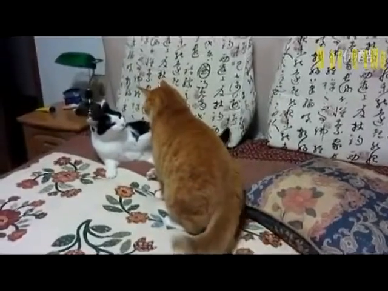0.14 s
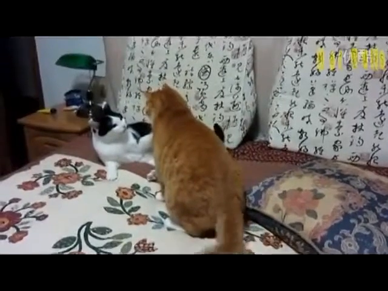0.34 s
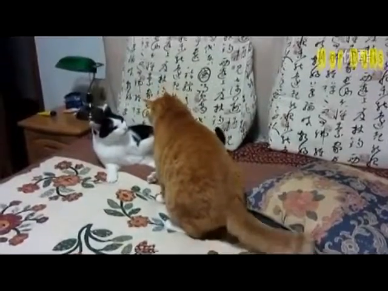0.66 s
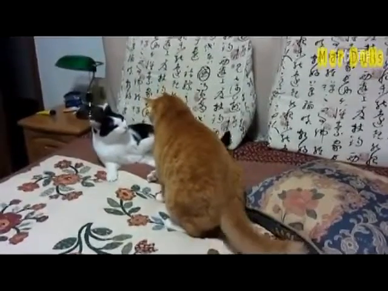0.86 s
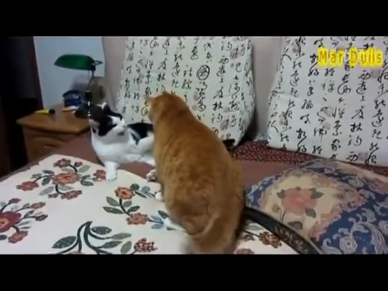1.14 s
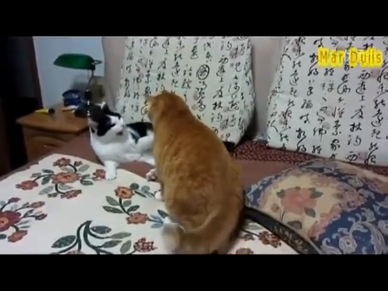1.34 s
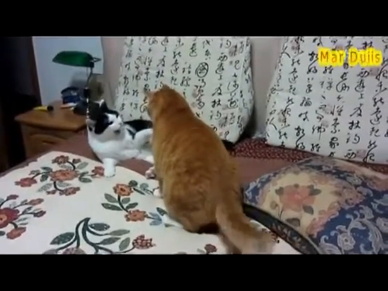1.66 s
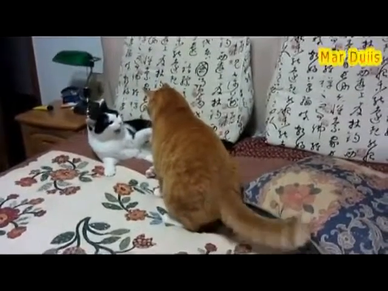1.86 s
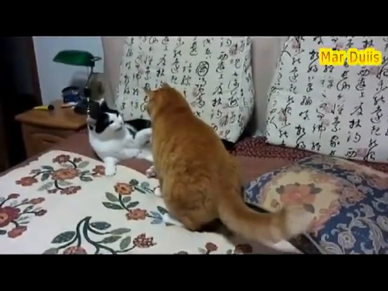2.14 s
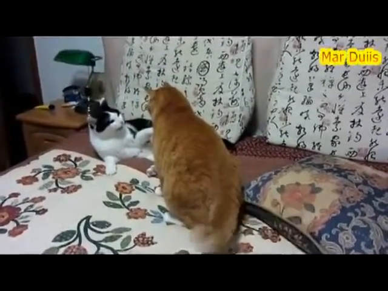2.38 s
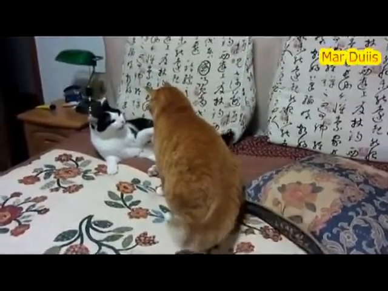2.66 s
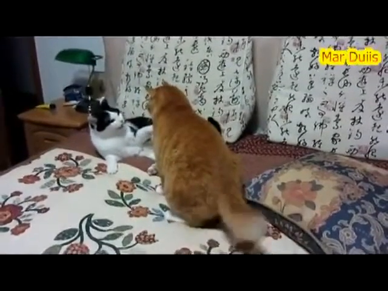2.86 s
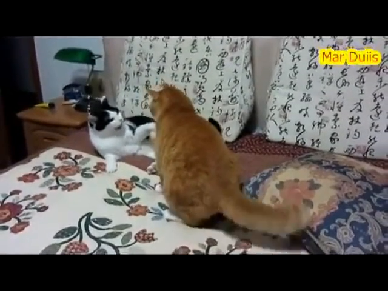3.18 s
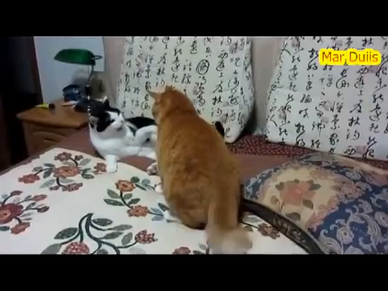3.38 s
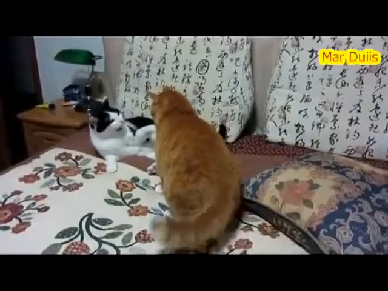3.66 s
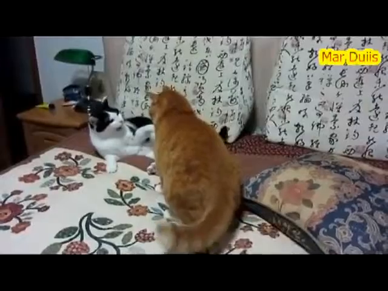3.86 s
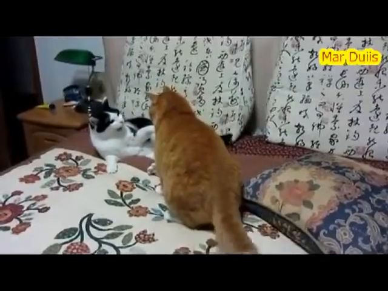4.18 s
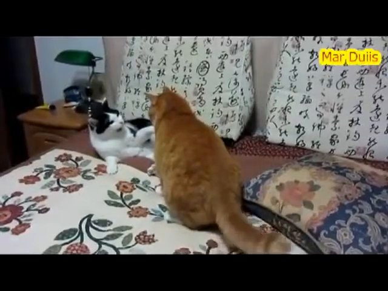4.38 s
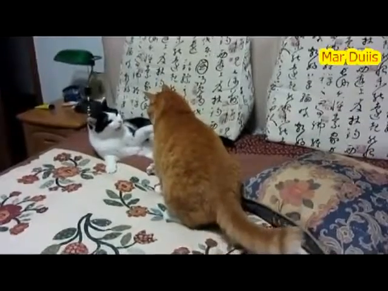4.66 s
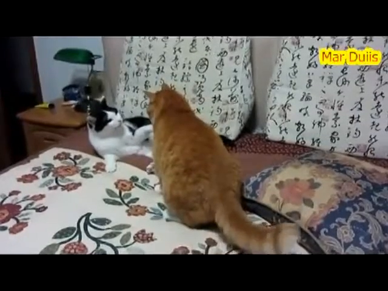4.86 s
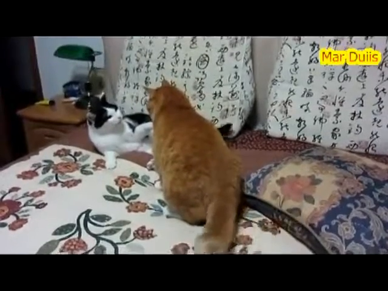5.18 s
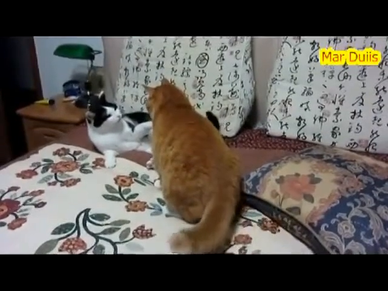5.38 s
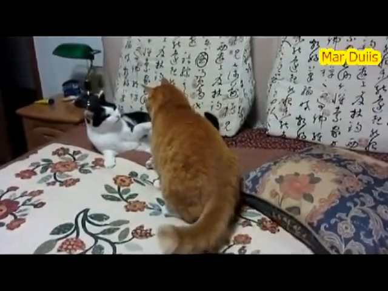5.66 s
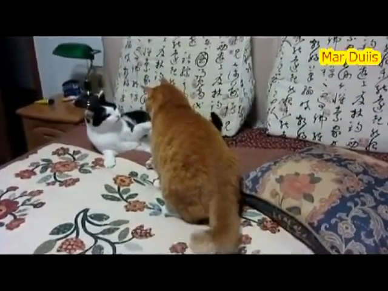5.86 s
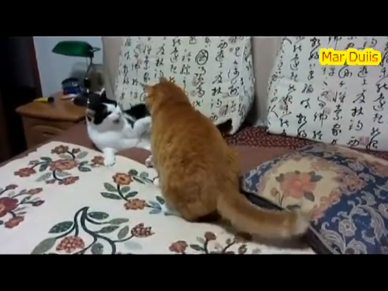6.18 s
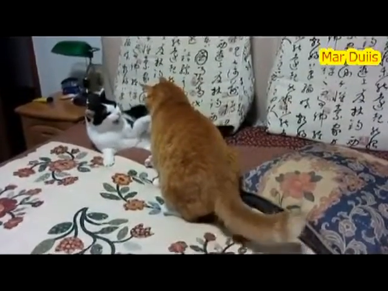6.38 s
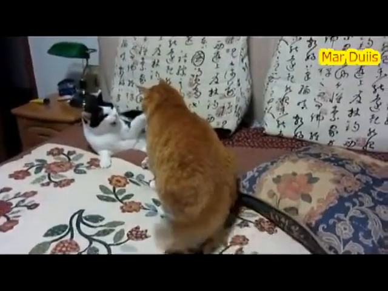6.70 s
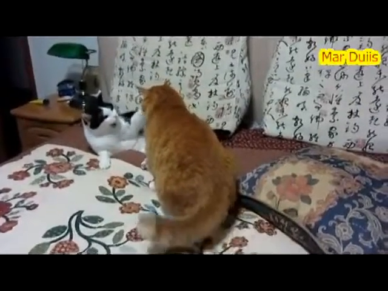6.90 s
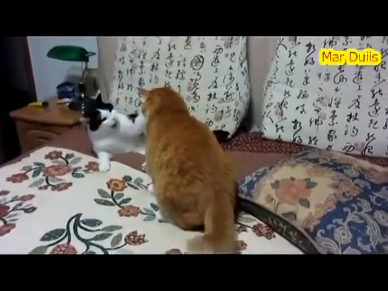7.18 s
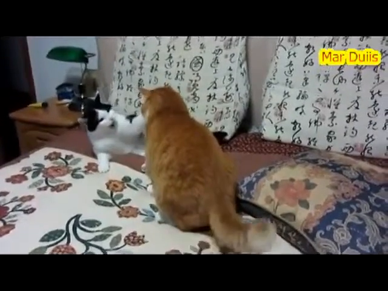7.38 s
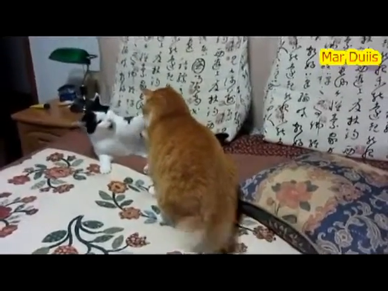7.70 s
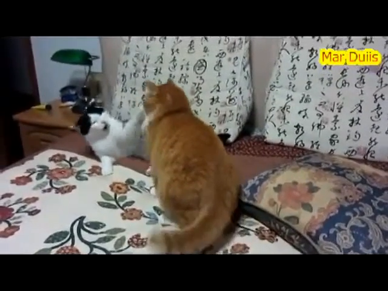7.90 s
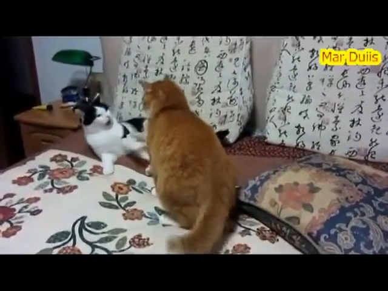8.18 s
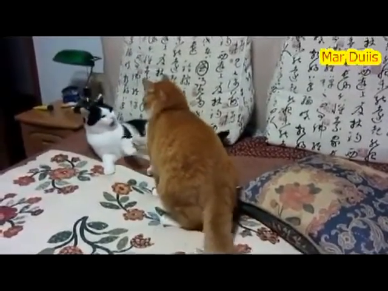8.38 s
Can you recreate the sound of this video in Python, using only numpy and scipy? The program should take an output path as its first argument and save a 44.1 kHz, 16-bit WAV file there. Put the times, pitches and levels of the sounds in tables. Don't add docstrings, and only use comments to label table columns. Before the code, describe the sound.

In a small soft-furnished bedroom, low mains hum, hiss and a faint clock tick precede one tiny mew. A nearby cat then gives three long, tense yowls, the second catching and resuming, the last breaking hoarse and sinking. A soft low thud comes through the floor during the last call, and paws drag on the quilt at the end. Close stereo microphone, slightly compressed, with background rising at the first call.

```python
import sys
import numpy as np
from scipy import signal
from scipy.fft import rfft, irfft, next_fast_len
from scipy.io import wavfile
from scipy.ndimage import uniform_filter1d, minimum_filter1d

SR = 44100
rng = np.random.default_rng(int(sys.argv[2]) if len(sys.argv) > 2 else 0)


def decibels_to_gain(level_db):
    exponent = np.asarray(level_db, float) / 20
    return 10 ** exponent


def log_audio(samples):
    frames = np.atleast_2d(samples).T
    limited = np.clip(frames, -1, 1)
    pcm = np.round(limited * 32767).astype(np.int16)
    wavfile.write(sys.argv[1], SR, pcm)


N = 376557

# frequency [Hz], level [dB rms].
HUM_LINES = [(100, -53.5), (200, -77.5), (300, -71.5), (400, -70.5), (500, -63.5), (600, -65), (700, -67)]
# frequency [Hz], level [dB per Hz].
HISS_SPECTRUM = [(15, -41), (25, -18.5), (65, -12.5), (83, -9), (102, -3.5), (129, -9), (398, -12.5),
                 (452, -11.5), (501, -11.5), (631, -11.5), (1170, -12), (3700, -21), (8830, -38),
                 (11400, -44.5), (14800, -61), (22000, -120)]
# frequency [Hz], left-right likeness [-1 to 1].
PORT_LIKENESS = [(25, .6), (60, 1), (100, 1), (140, 0.46), (340, 0.41), (810, 0.34), (1930, 0.11),
                 (4600, 0.037), (11000, 0.21)]
# time [s], gain [dB].
RECORDER_GAIN = [(0, -7.5), (1.1, -7), (1.16, 2), (3.2, 2), (4, 5.5), (5, 2.5), (7, 3), (7.5, 5),
                 (8.54, 2.5)]
# time [s], level [dB].
CLOCK_TICKS = [(.28, -51), (1.28, -41), (2.281, -41), (3.28, -36.5), (4.282, -35), (5.282, -39.5),
               (6.28, -38.5), (7.278, -45), (8.281, -39.5)]
# frequency [Hz], level [dB per Hz].
CLOCK_SPECTRUM = [(180, -30), (300, -4.5), (767, 2.5), (1010, 4.5), (1100, 3), (1340, 0), (1590, 2),
                  (9000, -27.5), (11700, -56), (19800, -120)]
# frequency [Hz], level [dB per Hz].
QUILT_SPECTRUM = [(350, -31), (600, -15), (679, -32), (1350, -0.5), (2870, -6), (3500, -13.5), (11400, -36),
                  (14800, -68.5), (22000, -120)]
# frequency [Hz], left minus right [dB].
CAT_PORT_BALANCE = [(400, 0), (810, -0.5), (1300, -1), (1900, -2), (2400, -4.5), (3000, -6), (4000, 2.5),
                    (5700, -1), (9000, -2)]
# frequency [Hz], left lead [radians].
CAT_PORT_PHASE = [(400, -1.07), (1000, 0.31), (1600, 0.045), (2070, -1.27), (2600, 0), (3270, 1), (4050, 1),
                  (5250, 0.2), (6120, -0.36), (7670, 0.94), (11000, 0)]

# time [s], pitch [Hz], level [dB], lip rounding [0-1].
MEW_VOICE = [
    (.848, 623, -70, .8),
    (0.859, 627, -50.5, 0.72),
    (.875, 607, -52, 0.74),
    (.9, 614, -58, .8),
    (.925, 610, -62, .6),
]
FIRST_YOWL = [(1.1, 490, -56, .7), (1.122, 459, -36, 1), (1.15, 413.8, -33, 0.8), (1.245, 439, -29, 0.7),
              (1.334, 431.8, -28, 0.79), (1.5, 448.3, -25.5, 0.52), (1.59, 475.6, -25.5, 0.41),
              (1.72, 472.2, -28, 1.15), (1.95, 480.4, -27.5, 0.95)]
SECOND_YOWL = [(3.272, 494.3, -32, 0.97), (3.296, 463.4, -26.5, 0.62), (3.375, 448.6, -28, 1),
               (3.46, 470.4, -32, 0.85), (3.61, 444, -30, 1), (3.713, 449, -33.5, 0.5),
               (3.803, 467.3, -25.5, 1), (3.93, 434, -31, 0.94), (4.06, 464.6, -51, .6)]
CATCH_VOICE = [
    (4.1, 499, -44, 0.54),
    (4.142, 468.3, -36.5, .5),
    (4.194, 449.3, -38, .87),
    (4.262, 458.4, -44.5, 0.62),
    (4.306, 470, -48, .8),
]
RESUMED_YOWL = [(4.32, 438, -52, 0.66), (4.356, 438.8, -33.5, 1), (4.4, 454.6, -29.5, 0.9),
                (4.444, 448, -28, 1), (4.522, 434.3, -28.5, 0.84), (4.66, 428, -26.5, 0.95)]
THIRD_YOWL = [(6.212, 441.5, -31.5, .5), (6.226, 425.5, -25, .3), (6.29, 440.2, -29, .58),
              (6.324, 464, -25.5, 0.56), (6.37, 486.6, -26, 0.92), (6.63, 460, -25.5, 0.96),
              (6.78, 449, -30.5, 0.79), (6.888, 438, -29, 1), (7.126, 463, -28, 1)]
HOARSE_YOWL = [(7.215, 477.5, -28, 0.91), (7.278, 454, -28, 0.63), (7.321, 465, -28.5, 0.81),
               (7.499, 434.2, -31, 0.62), (7.593, 457, -31, 0.8), (7.683, 429.3, -31, 0.71),
               (7.783, 448.2, -28, 0.69), (8.004, 462.4, -26.5, 0.56), (8.1, 455.6, -32, 0.46)]
SINKING_YOWL = [
    (8.139, 425, -37, .2),
    (8.191, 418.2, -42.5, 0.22),
    (8.251, 403, -44.5, .2),
    (8.29, 392, -47.5, .2),
]

# time [s], jaw opening [dB], mouth resonance [Hz], throat resonance [Hz],
# breath [dB].
MEW_MOUTH = [
    (.85, -16, 2240, 700, -38),
    (.92, -24, 2060, 700, -38),
]
FIRST_MOUTH = [(1.151, -4, 2140, 930, -26.5), (1.22, -10.5, 2240, 880, -58), (1.34, -13, 2250, 900, -50),
               (1.38, -3.5, 2280, 1030, -25.5), (1.58, -0.5, 2204, 980, -25), (1.72, -8, 2220, 1050, -36.5),
               (1.93, -30, 2160, 955, -37.5)]
SECOND_MOUTH = [(3.27, -5.5, 2080, 950.6, -39), (3.33, 1.5, 2310, 920, -28), (3.39, -11, 2210, 930, -38),
                (3.475, -17, 2120, 880, -40), (3.68, -22, 1950, 1120, -40), (3.8, -35, 2180, 960, -43),
                (3.93, -26, 2000, 1140, -52)]
RESUMED_MOUTH = [(4.1, -26, 2250, 930, -32), (4.149, -44, 2160, 876, -46.5), (4.271, -22, 1980, 900, -24.5),
                 (4.356, -9, 2230, 920, -39), (4.444, -17.5, 2270, 1010, -38), (4.68, -40, 2280, 884, -40)]
THIRD_MOUTH = [(6.21, -2, 2320, 900, -32.5), (6.366, 0, 2310, 1070, -24.5), (6.466, -4, 2160, 1010, -33),
               (6.63, -19, 2240, 950, -37.5), (6.78, -30, 2010, 1290, -39), (6.968, -34, 2020, 1220, -28.5),
               (7.126, -39.5, 2340, 896, -28.5)]
HOARSE_MOUTH = [(7.214, -24, 2010, 1120, -34.5), (7.32, -51, 2100, 1064, -53),
                (7.48, -49, 2270, 1230, -35.5), (7.594, -31, 1915, 1120, -25.5),
                (7.784, -38, 1824, 1175, -27.5), (7.95, -52.5, 1914, 930, -34.5),
                (8.1, -33, 1680, 1000, -34.5)]
SINKING_MOUTH = [
    (8.141, -15.5, 1570, 1050, -26.5),
    (8.2, -10.5, 1420, 930, -26),
    (8.29, -9, 1410, 847, -25),
]
# start [s], length [s], irregular share [0-1], strong-weak alternation [0-1].
FOLD_CRACKS = [(1.1, .26, .22, .12), (1.36, .165, .26, .25), (1.655, .055, .2, 1.1), (3.27, .14, .14, .1),
               (4.46, .08, .07, .1), (4.69, .08, .4, 0), (6.2, .14, .2, .3), (6.88, .3, .13, .05),
               (7.18, .11, .42, .3), (7.29, .2, .25, .15), (7.49, .5, .21, .1), (7.99, .15, .45, .08),
               (8.14, .15, .2, 0)]


def rms_one(x):
    return x / np.sqrt(np.mean(x ** 2) + 1e-20)


def at_hz(points, hz):
    table = np.array(points)
    return np.interp(np.log(hz), np.log(table[:, 0]), table[:, 1])


def along(rows, t):
    s, *columns = np.transpose(rows)
    return [np.interp(t, s, column) for column in columns]


def drift(rate_hz, size=N):
    pole = np.exp(-2 * np.pi * rate_hz * 16 / SR)
    noise = rng.standard_normal(size // 16 + 3002)
    slow = signal.lfilter([1], [1, -2 * pole, pole * pole], noise)[3000:]
    return np.interp(np.arange(size) / 16, np.arange(len(slow)), rms_one(slow))


def peak(hz, centre_hz, width_hz):
    return 1 / (1 + (2 * (hz - centre_hz) / width_hz) ** 2) ** 3


def stereo_noise(spectrum):
    hz = np.maximum(np.fft.rfftfreq(N, 1 / SR), 10)
    port_ring_db = 4.8 * peak(hz, 8900, 1300)
    mid, side = rfft(rng.standard_normal((2, N))) * decibels_to_gain(at_hz(spectrum, hz) + port_ring_db)
    alike = np.clip(at_hz(PORT_LIKENESS, hz), -.9, .98)
    ports = np.sqrt(1 + alike) * mid + np.sqrt(1 - alike) * side * [[1], [-1]]
    return rms_one(irfft(ports, N))


def hum():
    t = np.arange(N) / SR
    total = 0
    for hz, level_db in HUM_LINES:
        strength = np.sqrt(2) * decibels_to_gain(level_db + 0.9 * drift(5.8))
        total = total + strength * np.sin(2 * np.pi * hz * t + 0.48 * drift(3))
    return total


def hiss():
    return decibels_to_gain(-47 - 0.5 + 0.54 * drift(2.7)) * stereo_noise(HISS_SPECTRUM)


def clock():
    t = np.arange(N) / SR
    shape = 0
    for s, level_db in CLOCK_TICKS:
        age = t - s
        rise = np.exp(-(age / 0.026) ** 2)
        fall = np.exp(-np.maximum(age, 0) / 0.099)
        shape = shape + decibels_to_gain(level_db) * np.where(age < 0, rise, fall)
    return shape * decibels_to_gain(1.5 * drift(60)) * stereo_noise(CLOCK_SPECTRUM)


def thud():
    start_s, level_db, rise_s, hold_s, fall_db_per_s = 7.26, -44.5, .1, 0.27, 120
    t = np.arange(N) / SR
    age = t - start_s
    fall_db = fall_db_per_s * np.maximum(age - rise_s - hold_s, 0)
    ring = np.clip(age / rise_s, 0, 1) * decibels_to_gain(level_db - fall_db)
    shudder = decibels_to_gain(-54) * np.exp(-((t - 7.65) / .1) ** 2) * np.sin(2 * np.pi * 27 * t)
    return np.sqrt(2) * ring * np.sin(2 * np.pi * 72.5 * t) + shudder


def rustle():
    peak_s, level_db, rise_s, fall_s = 8.3, -37.5, 0.19, 0.073
    age = np.arange(N) / SR - peak_s
    stroke = np.where(age < 0, np.exp(-(age / rise_s) ** 2), np.exp(-np.maximum(age, 0) / fall_s))
    return decibels_to_gain(level_db + 2.0 * drift(68.13)) * stroke * stereo_noise(QUILT_SPECTRUM)


def smack():
    centre_s, centre_hz, level_db, length_s = 6.14, 5300, -54, 0.014
    t = np.arange(N) / SR
    gap = signal.butter(2, [centre_hz * .93, centre_hz * 1.02], "band", fs=SR, output="sos")
    wet = signal.sosfilt(gap, rng.standard_normal(N))
    return decibels_to_gain(level_db) * np.exp(-((t - centre_s) / length_s) ** 2) * rms_one(wet)


def room(x):
    t60_s, level_db = 0.34, -12
    size = next_fast_len(N + SR)
    hz = np.fft.rfftfreq(size, 1 / SR)
    t60 = t60_s / (1 + hz / 6000)
    spectrum = rfft(x, size)
    out = []
    for lags in rng.uniform(.006, .028, (2, 8)):
        loops = [decibels_to_gain(-60 * d / t60) * np.exp(-2j * np.pi * hz * d) for d in lags]
        echoes = sum(g / (1 - g) * (-1) ** k for k, g in enumerate(loops))
        out.append(irfft(spectrum * echoes, size)[:N])
    both = np.mean(out, axis=0)
    apart = signal.sosfilt(signal.butter(2, 1800, "high", fs=SR, output="sos"), out - both)
    return decibels_to_gain(level_db) * (both + apart)


def folds(t):
    start = .35 * np.exp((t[0] - t) / .025)
    end = .7 * np.exp(-((t[-1] - t) / .07) ** 2)
    rough = .08 + (start + end) * min((t[-1] - t[0]) / .3, 1) ** 2
    halves = 0
    for s, length, irregular, alternating in FOLD_CRACKS:
        inside = np.clip(np.minimum(t - s, s + length - t) / .035 + .5, 0, 1)
        rough = rough + irregular * inside
        halves = halves + alternating * inside
    return np.minimum(rough, .8), halves


def released(rows):
    s, pitch, level_db, lips = rows[-1]
    return rows + [(s + .03, pitch, level_db - 9, lips), (s + .09, pitch, level_db - 18, lips)]


def tract_power(hz, pitch, level_db, upper, jaw_db, mouth_hz, throat_hz, air_db):
    throat_db = np.minimum(-9.5 - 0.57 * (level_db + 28) - 0.14 * jaw_db, 0)
    lifted = 1 + 0.34 * np.minimum(pitch / 450 - 1, .08)
    throat = decibels_to_gain(2 * throat_db) * peak(hz, throat_hz, 895)
    mouth = peak(hz, mouth_hz, 736) + 1.37 * upper ** 5 * peak(hz, 2661 * lifted, 580)
    jaw_hz = 3273 + 530 * (1 - upper)
    jaw = decibels_to_gain(2 * jaw_db) * (peak(hz, jaw_hz, 850) + 0.027 * peak(hz, 4540, 1200))
    breath = decibels_to_gain(2 * air_db) * 0.48 * peak(hz, 7810, 3600)
    return throat + mouth + jaw + breath + decibels_to_gain(-62.5) * peak(hz, 4600, 1500)


def call(rows, mouth_rows):
    at = np.arange(round(rows[0][0] * SR), round(rows[-1][0] * SR))
    t = at / SR
    size = len(t)
    pitch, level_db, upper = along(rows, t)
    jaw_db, mouth_hz, throat_hz, air_db = along(mouth_rows, t)
    rough, halves = folds(t)
    waver = (0.0029 + 0.02357 * rough) * drift(30, size)
    phase = 2 * np.pi * np.cumsum(pitch * (1 + waver)) / SR
    scatter = [drift(340, size) for _ in range(5)]
    out, power = 0, 1e-12
    for k in np.arange(1.5, 22, .5):
        tract = tract_power(k * pitch, pitch, level_db, upper, jaw_db, mouth_hz, throat_hz, air_db)
        flutter_db = (1.57 + 4.8 * rough) * min(k / 5, 1) * drift(12.2, size)
        strength = np.sqrt(tract) * decibels_to_gain(flutter_db)
        if k % 1 != 0:
            strength = strength * halves * min(k / 4, 1) ** 2
        smear = rough * (.35 + .15 * min(k, 6) + 0.03 * k * decibels_to_gain(jaw_db))
        share = np.clip(smear + (k / 18) ** 4, 0, .95)
        line = np.sqrt(1 - share ** 2) + share * scatter[int(2 * k) % 5]
        out = out + strength * line * np.sin(k * phase + 1.3 * k * k)
        power = power + strength ** 2 / 2
    rasp = decibels_to_gain(0.87 * drift(14, size) + 2.5 * rough * drift(53, size))
    out = decibels_to_gain(level_db) * rasp * out / np.sqrt(power)
    chest_db = -31 - .022 * np.maximum(mouth_hz - 1950, 0)
    chest_db = chest_db + level_db / 4 + np.minimum(level_db + 46, 0) / 2 + drift(8, size)
    out = out + decibels_to_gain(chest_db) * np.sin(phase)
    edge = np.clip(np.minimum((t - t[0]) / 0.005, (t[-1] - t) / 0.025), 0, 1)
    voice = np.zeros(N)
    voice[at] = out * edge
    return voice


def cat():
    third = THIRD_YOWL + HOARSE_YOWL + SINKING_YOWL
    third_mouth = THIRD_MOUTH + HOARSE_MOUTH + SINKING_MOUTH
    calls = [(released(FIRST_YOWL), FIRST_MOUTH), (SECOND_YOWL, SECOND_MOUTH),
             (CATCH_VOICE, RESUMED_MOUTH), (released(RESUMED_YOWL), RESUMED_MOUTH),
             (third, third_mouth), (MEW_VOICE, MEW_MOUTH)]
    spectrum = rfft(sum(call(rows, mouth_rows) for rows, mouth_rows in calls))
    hz = np.maximum(np.fft.rfftfreq(N, 1 / SR), 10)
    half = decibels_to_gain(at_hz(CAT_PORT_BALANCE, hz) / 2) * np.exp(.5j * at_hz(CAT_PORT_PHASE, hz))
    return np.array([irfft(spectrum * half, N), irfft(spectrum / half, N)])


def scene():
    voice = cat()
    gain = decibels_to_gain(along(RECORDER_GAIN, np.arange(N) / SR)[0])
    background = gain * (hum() + hiss())
    return voice + room(voice.mean(axis=0)) + background + clock() + thud() + rustle() + smack()


def thin_weak_bands(x, top_db=-47, valley_db=-33, dead_db=-3.5):
    hz, t, cells = signal.stft(x, SR, nperseg=1024)
    power = np.abs(cells.mean(axis=0)) ** 2 + 1e-18
    keep = np.ones(power.shape)
    luck = decibels_to_gain(11.0 * uniform_filter1d(rng.standard_normal((42, len(t))), size=3, axis=1))
    bands = power[:504].reshape(42, 12, -1).sum(axis=1) * luck
    wide = np.repeat(bands, 12, axis=0)
    keep[126:504] = 1 / (1 + decibels_to_gain(top_db * 4) * (power.sum(axis=0) / wide[126:]) ** 2)
    here = uniform_filter1d(uniform_filter1d(power, size=2, axis=0), size=6, axis=1)
    near = -minimum_filter1d(-power, size=21, axis=0)
    usual = np.exp(uniform_filter1d(np.log(here), size=21, axis=0))
    floor = np.maximum(decibels_to_gain(2 * valley_db) * near, decibels_to_gain(2 * dead_db) * usual)
    keep[14:126] = (1 / (1 + (floor / here) ** 3))[14:126]
    return signal.istft(cells * keep, SR, nperseg=1024)[1][:, :N]


def low_pass(x):
    return signal.sosfilt(signal.butter(12, 11560, fs=SR, output="sos"), x)


def record(dry):
    rounded = 0.41 * np.tanh(dry / 0.39)
    mix = thin_weak_bands(rounded)
    return low_pass(mix)


dry = scene()
out = record(dry)
log_audio(out)
```